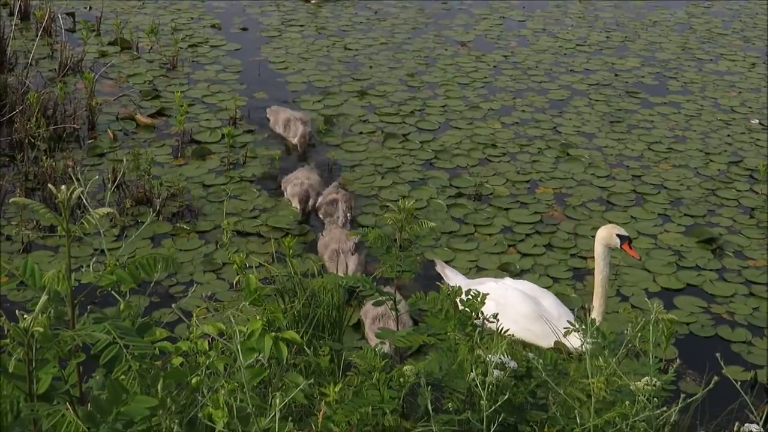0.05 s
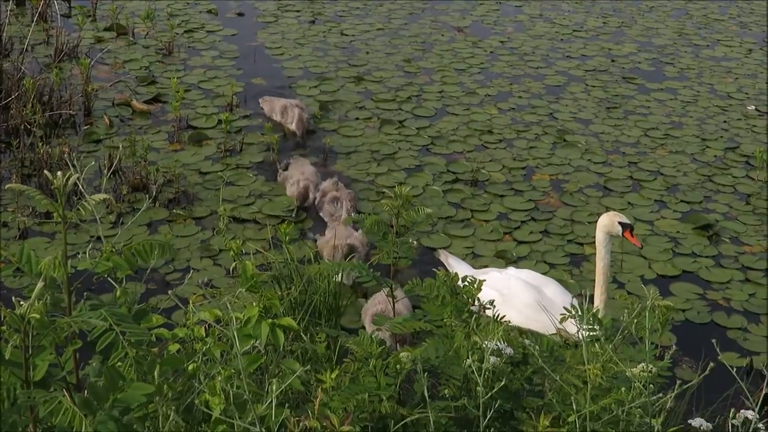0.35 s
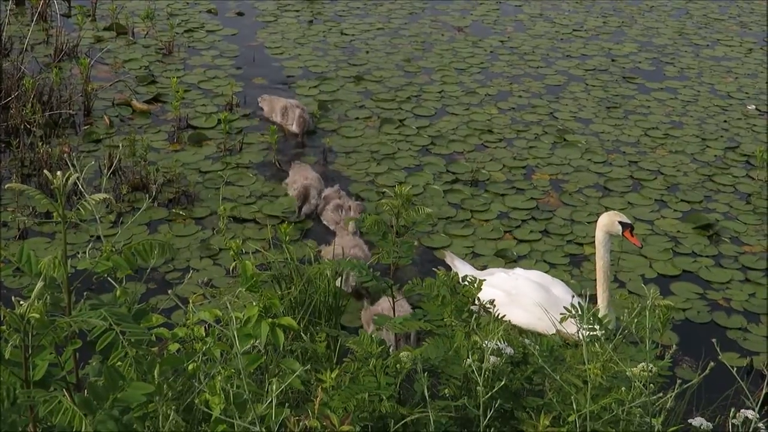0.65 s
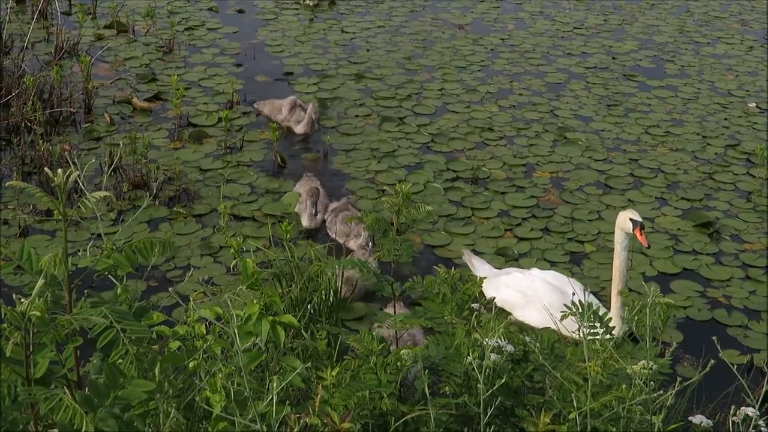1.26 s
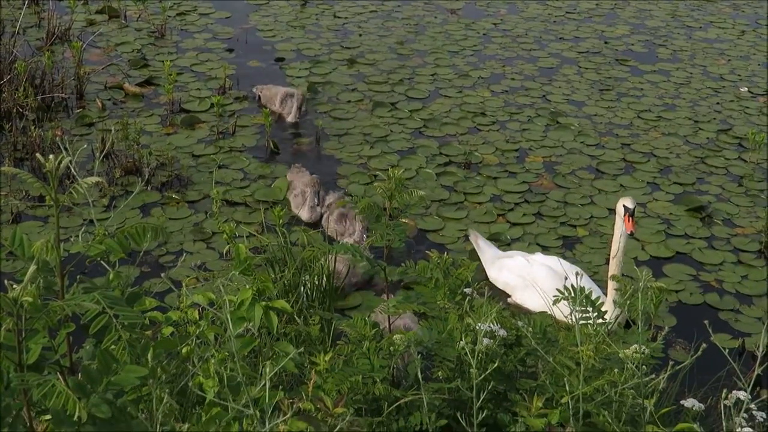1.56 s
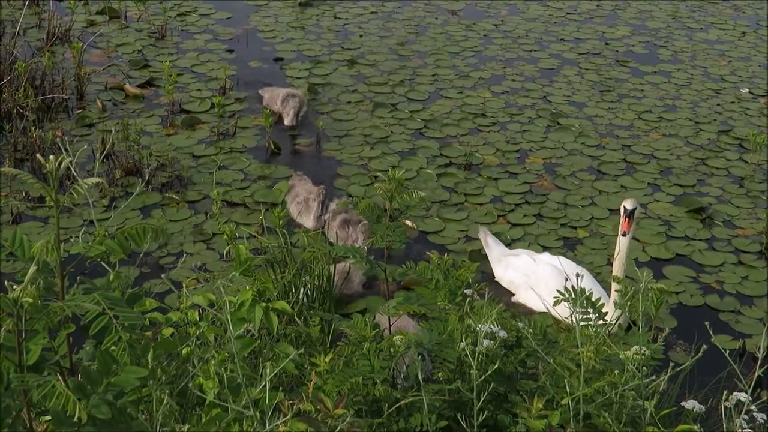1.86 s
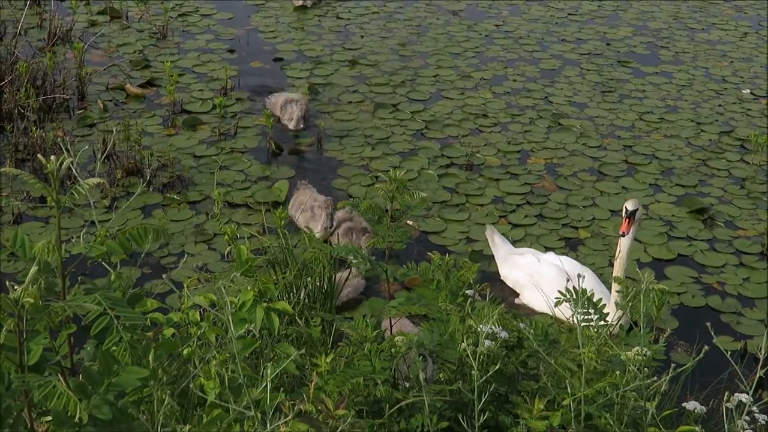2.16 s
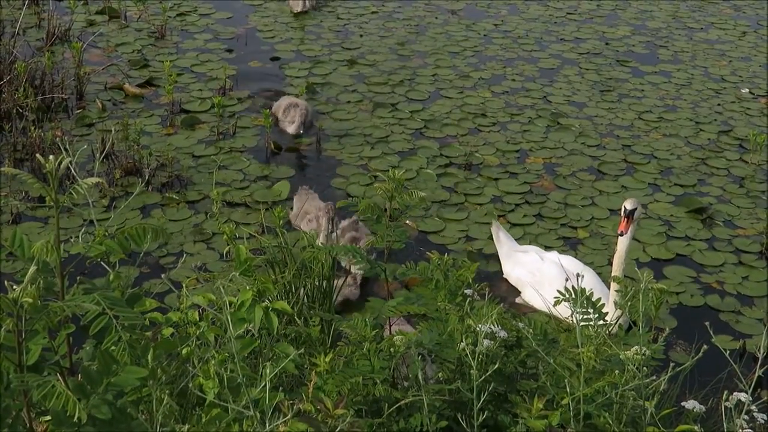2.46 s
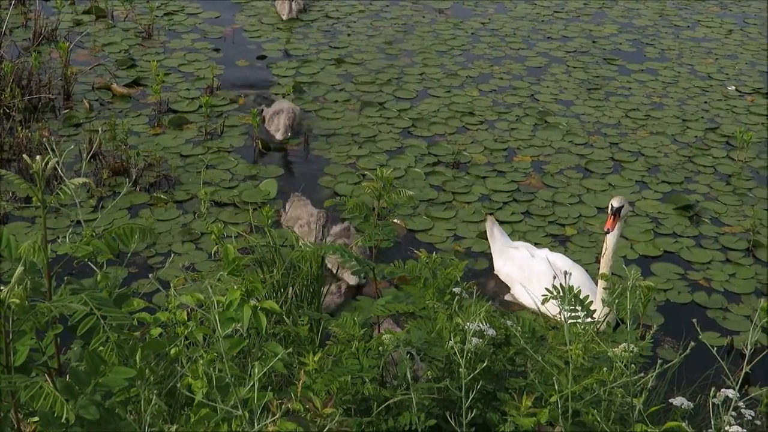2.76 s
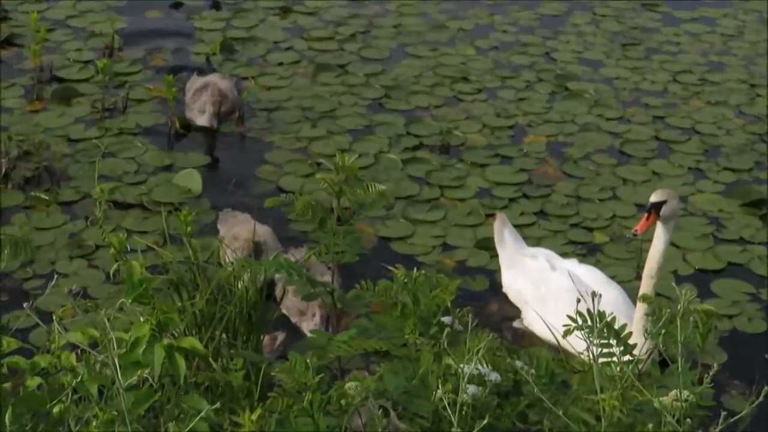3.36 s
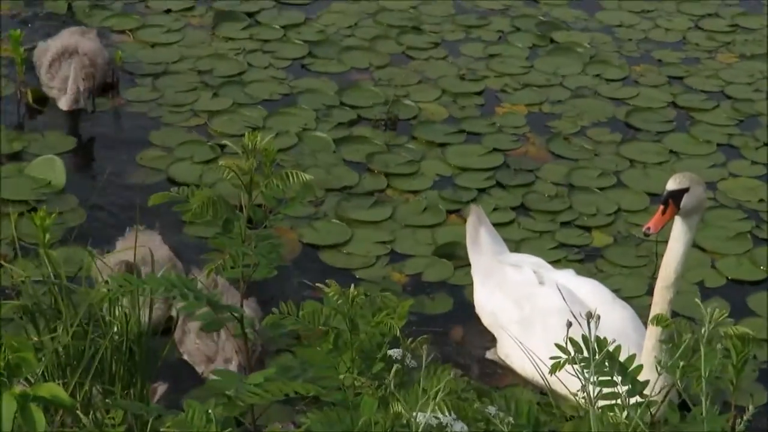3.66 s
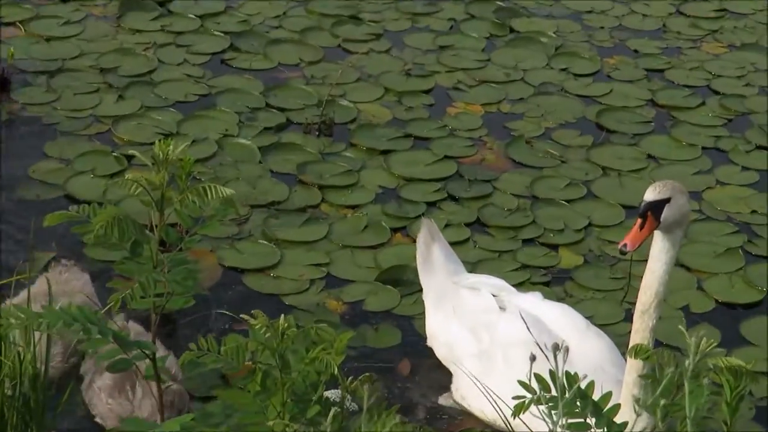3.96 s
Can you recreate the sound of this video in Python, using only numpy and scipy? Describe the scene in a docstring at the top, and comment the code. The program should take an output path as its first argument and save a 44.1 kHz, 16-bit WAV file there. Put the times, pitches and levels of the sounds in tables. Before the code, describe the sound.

Young swans give short, faint peeps at a pond while far-off traffic rumbles.

```python
"""Cygnets among lily pads

Cygnets peep softly in arched, sometimes hoarse tones as they push through weeds at a pond's edge.
Leaves brush, stems snap and small bubbles ring, with faint echoes from the bank. Distant traffic
rumbles throughout and far songbirds whistle and trill. Near the end a camera's zoom motor whirrs,
and the camera's noise reduction gives the background a watery flicker."""
import sys
import numpy as np
from scipy import signal
from scipy.io import wavfile
from scipy.ndimage import uniform_filter1d

SR = 44100
rng = np.random.default_rng(int(sys.argv[2]) if len(sys.argv) > 2 else 0)


def put_to_file(sound):
    """Save the sound as 16-bit audio at rate SR, in the file named by the first command-line argument."""
    columns = np.atleast_2d(sound).T  # one column per channel
    safe = np.clip(columns, -1, 1)
    whole_steps = np.round(safe * 32767)
    wavfile.write(sys.argv[1], SR, whole_steps.astype(np.int16))


N = 176400
T = np.arange(N) / SR


def from_db(db):
    """Amplitude ratio: tenfold for every 20 dB."""
    return 10 ** (np.asarray(db) / 20)


def rms_one(x):
    """Normalisation to a root mean square of 1."""
    return x / np.sqrt(np.mean(x ** 2) + 1e-20)


def level(rows):
    """Amplitude envelope, linear in dB between (seconds, dB) points."""
    return from_db(np.interp(T, *np.transpose(rows)))


def at_hz(points, hz):
    """Interpolation of (Hz, value) points on a logarithmic frequency axis."""
    frequencies, values = np.transpose(points)
    return np.interp(np.log(hz), np.log(frequencies), values)


def pan(db):
    """Direction by level difference: two gains, the left db above the right."""
    return from_db(np.array([[.5], [-.5]]) * db)


def band(x, low, high):
    """Butterworth band-pass filter, edges in Hz."""
    sos = signal.butter(2, [low, min(high, SR / 2 - 1000)], "band", fs=SR, output="sos")
    return signal.sosfilt(sos, x + 1e-18)


def drift(corner_hz):
    """Random fluctuation: low-passed noise of unit rms."""
    pole = np.exp(-40 * np.pi * corner_hz / SR)
    slow = signal.lfilter([1], [1, -2 * pole, pole * pole], rng.standard_normal(N // 20 + 2002))[2000:]
    return np.interp(np.arange(N) / 20, np.arange(len(slow)), rms_one(slow))


def burst(start_s, decay_s):
    """Sudden onset followed by exponential decay."""
    return (T >= start_s) * np.exp(-np.clip((T - start_s) / decay_s, 0, 20))


def wash(spectrum, flicker_db):
    """Partly correlated stereo noise in half-octave bands that fluctuate independently."""
    # Each row: frequency in Hz, correlation between left and right.
    correlation = [(200, 0.98), (480, 0.91), (950, 0.93), (1890, 0.6), (3770, -0.35), (7520, 0.88),
                   (15000, -0.27)]
    out, edges = 0, 125 * 2 ** np.arange(0, 7.1, .5)
    white = rng.standard_normal((2, 2, N))
    for k, (low, high) in enumerate(zip(edges, edges[1:])):
        hz = np.sqrt(low * high)
        mid, side = band(white[k % 2], low, high)
        alike = at_hz(correlation, hz)
        stereo = np.sqrt(1 + alike) * mid + np.sqrt(1 - alike) * side * [[1], [-1]]
        out = out + from_db(at_hz(spectrum, hz) + flicker_db * drift(23)) * stereo
    return rms_one(out)


def traffic():
    """Superposition of distant vehicles: centred rumble, wavering engine tones and wide tyre noise."""
    # Each row of both: frequency in Hz, relative spectral density in dB.
    rumble_spectrum = [(20, -26), (31, -18), (40, 0), (50, -20.5), (62, -2), (77, 3), (100, -1), (125, -4),
                       (160, -7), (200, -12.5), (260, -17), (340, -35.5), (600, -29)]
    tyre_spectrum = [(150, -7), (300, 1), (480, 2), (650, -3), (950, 0), (1400, -9.5), (2000, -10.5),
                     (2800, -20), (3600, -21), (5000, -31.5), (7500, -30.5), (10000, -40.5), (15000, -43)]
    # Each row: time in seconds, relative level of the rumble in dB.
    rumble_swell = [(0, -38), (.2, -40.5), (.35, -37.5), (.47, -39.5), (.78, -39), (1.15, -42.5),
                    (1.4, -41.5), (1.52, -39.5), (1.65, -41), (2.35, -40.5), (2.8, -43), (3.4, -38),
                    (3.8, -41), (4, -39.5)]
    # Each row: frequency in Hz, level in dB, rms frequency deviation in Hz.
    engines = [(49.04, -50, 1.19), (76.96, -52.5, 2.756), (505.5, -69, 3.78), (636, -71.5, 1.97)]
    edges = 18 * 2 ** (np.arange(16) / 3)
    white = rng.standard_normal((2, N + SR))
    rumble, hum = 0, 0
    for k, (low, high) in enumerate(zip(edges, edges[1:])):
        gain = from_db(at_hz(rumble_spectrum, np.sqrt(low * high)))
        rumble += gain * band(white[k % 2], low, high)[SR:]
    for hz, db, waver_hz in engines:
        phase = 2 * np.pi * np.cumsum(hz + waver_hz * drift(3.87)) / SR
        hum += from_db(db) * np.sqrt(2) * np.sin(phase)
    left, right = wash(tyre_spectrum, flicker_db=1.73)
    left_lag_s = .00005  # the road lies a little to the right
    tyres = pan(-1) * np.array([np.interp(T - left_lag_s, T, left), right])
    return from_db(-1) * level(rumble_swell) * rms_one(rumble) + hum + from_db(-54.5) * tyres


def leaves():
    """Friction noise: a grainy, fading hiss of leaves brushed as the brood enters the weeds."""
    # Each row: time in seconds, level in dB.
    rustle = [(0, -79.5), (.55, -79), (.75, -83), (1.1, -84), (4, -100)]
    grains = rng.standard_normal((2, N)) * from_db(2.2 * drift(150))
    return level(rustle) * rms_one(band(grains, 4330, 14500))


def cygnets():
    """Harmonic tones on an arched pitch; fast random frequency and amplitude modulation sounds hoarse."""
    # Each row: middle and length in seconds, top pitch in Hz, level in dB, relative level of the
    # octave in dB, roughness from 0 to 1, catch in the voice from 0 to 1, leftward pan in dB.
    peeps = [(0.046, 0.087, 2192, -64, -7.5, 0.88, 0.3, 0), (.234, 0.065, 2204, -62, -6, 0.88, 0.3, 2.5),
             (.265, .047, 2250, -57.5, -30, 0.2, 0.13, -2), (0.368, 0.049, 2340, -57.5, -33, 0.07, 0, -2.1),
             (0.443, 0.057, 2210, -56.5, -26, 0.54, 0.06, -1.1), (0.546, 0.051, 2375, -53.5, -27, 0, 0, -3),
             (0.64, 0.072, 2186, -59.5, -38, 0, 0.05, -8), (0.723, 0.045, 2340, -56, -29, 0.2, 0, -1.5),
             (0.789, 0.05, 2130, -66.5, -30, .8, 0.2, -5), (2.374, 0.037, 2300, -49, -14, 0.08, 0.8, 0),
             (2.574, 0.043, 2290, -58, -6.5, 0, 0.29, 1.5), (2.775, 0.038, 2273, -49.5, -20, 0, 0.73, -0.5),
             (3.012, 0.028, 2173, -57.5, -16, 0.43, 0.4, -1), (3.405, 0.026, 1934, -59.5, -23, 0.2, 0.5, 1),
             (3.58, 0.038, 1970, -69, -23, 0.35, 0, 5), (3.744, .05, 2044, -67.5, -16, 0.4, 0.03, -1)]
    arch_drop, arch_s = .029, .0265  # fractional fall in pitch at this time either side of the top
    lead_s, catch_s, catch_width_s = .026, .0186, .0059  # a lead-in note, then a break, before the middle
    out = np.zeros((2, N))
    jitter, flutter, wobble = drift(260), drift(260), drift(35)
    for middle, length, hz, db, octave_db, rough, catch, pan_db in peeps:
        near = np.abs(T - middle) < length
        t = T[near] - middle
        onset = np.clip(-2 * t / length, 0, 1)  # falls to 0 by the middle: peeps start rough and bright
        rasp = np.maximum(rough, .34 * onset)
        arch = 1 - 2 * arch_drop * (1 - .5 ** ((t / arch_s) ** 2))
        pitch = hz * (arch + .038 * rasp * jitter[near] + .0052 * wobble[near])
        scoop = 1 - 2.06 * catch * np.maximum(-(t + catch_s), 0)  # the lead-in slides upward
        phase = 2 * np.pi * np.cumsum(pitch * scoop) / SR
        swell = np.exp(-np.abs(2 * t / length) ** 3.6)
        lead = from_db(-4.5) * np.exp(-((t + lead_s) / (2 * catch_width_s)) ** 2)
        voice_break = 1 - catch * np.exp(-((t + catch_s) / catch_width_s) ** 2)
        fundamental = (swell + catch * lead) * voice_break * np.sin(phase)
        third, fourth = from_db(-28.5 + 18 * onset), from_db(-14.5) * rough
        overtones = np.sin(2 * phase) + third * np.sin(3 * phase) + fourth * np.sin(4 * phase)
        note = fundamental + from_db(octave_db) * swell * overtones
        out[:, near] += pan(pan_db) * from_db(db) * np.sqrt(2) * note * (1 + .64 * rasp * flutter[near])
    return out


def stems():
    """Impulsive excitation: each tiny snap of a weed is a bright, quickly damped burst of noise."""
    # Each row: start in seconds, initial level in dB, centre frequency in Hz.
    ticks = [(.1211, -67, 12000), (.3686, -73, 11000), (.4392, -60, 7500), (.471, -68, 9000),
             (.5135, -63, 12000), (.5228, -62, 11000), (0.528, -54, 9000), (.5505, -68, 9500),
             (.624, -64, 5970), (.6644, -69, 9000), (0.911, -56, 14000), (1.0011, -68, 12500),
             (1.1557, -67.5, 8500), (1.3823, -69, 12500), (1.5857, -73, 10000), (1.9839, -67.5, 9000),
             (2.0133, -72, 10000), (2.403, -75, 9800)]
    decay_s = .0014
    out, grit = np.zeros((2, N)), rng.standard_normal((2, N))
    for start, db, hz in ticks:
        near = (T >= start) & (T < start + 10 * decay_s)
        stereo = grit[0, near] + .4 * grit[1, near] * [[1], [-1]]
        snap = rms_one(band(stereo, hz * .64, hz * 1.34))
        out[:, near] += from_db(db) * snap * np.exp(-(T[near] - start) / decay_s)
    return out


def plips():
    """Bubble resonance: small bubbles ring as damped oscillators, with a dull puff of spray."""
    # Each row: start in seconds, relative level in dB.
    splashes = [(.262, -64), (0.4406, -60), (0.4452, -55.5), (.527, -60), (0.617, -67), (1.983, -57)]
    # Each row: resonant frequency in Hz, gain in dB, time to decay by 60 dB in seconds.
    bubble_modes = [(1910, 3.5, 0.028), (2160, -3, 0.06), (2500, 8.5, 0.021), (3110, 4, 0.016)]
    starts, levels_db = np.transpose(splashes)
    puffs = sum(from_db(db + 12) * burst(start, decay_s=.0046) for start, db in splashes)
    spray_hz = (1400, 3700)
    spray = band(puffs * rng.standard_normal(N), *spray_hz)
    out = band(spray, *spray_hz)  # a second pass steepens the band edges
    for hz, mode_db, t60 in bubble_modes:
        impulses = np.zeros(N)
        strengths = from_db(levels_db + mode_db + rng.normal(0, .67, len(starts)))
        onsets = starts + rng.uniform(0, .002, len(starts))
        impulses[(onsets * SR).astype(int)] = strengths
        radius, angle = from_db(-60 / (t60 * SR)), 2 * np.pi * hz / SR
        feedback = [1, -2 * radius * np.cos(angle), radius ** 2]
        out += signal.lfilter([0, np.sin(angle)], feedback, impulses + 1e-18)
    return out


def bank_echoes(x):
    """Scattering from the bank and reeds: delayed copies, weaker the later they arrive."""
    echo_db, t60_s = -13, .2
    out = np.zeros((2, N))
    for k, delay in enumerate(rng.uniform(.004, .14, size=24)):
        lag = int(delay * SR)
        out[k % 2, lag:] += from_db(-60 * delay / t60_s) * x[k % 2, :-lag]
    return from_db(echo_db) * out


def songbirds():
    """Frequency glides make thin whistles; distance blurs trills into fluttering bands of noise."""
    # Each row: start and length in seconds, first and last frequency in Hz, level in dB.
    whistles = [(.865, .135, 5380, 5365, -72.5), (1.368, .045, 4400, 6000, -76.5),
                (1.91, .075, 4600, 6400, -80), (2.095, .07, 5350, 6100, -79.5)]
    # Each row: centre and bandwidth in Hz, level in dB, middle and half length in seconds.
    trills = [(2756, 134, -67, 1.44, 0.34), (2500, 790, -69.5, 1.27, 0.46), (3540, 980, -76, 1.28, 0.39),
              (4180, 710, -78, 1.4, 0.37), (4890, 320, -79.5, 1.34, 0.5), (2940, 330, -72, 2.04, 0.23),
              (2250, 190, -86, 1.7, 0.17), (3000, 400, -89, 3.2, 0.32), (2610, 220, -76, 3.33, 0.27),
              (5900, 1300, -78, 0.095, 0.21)]
    out = np.zeros((2, N))
    for start, length, first_hz, last_hz, db in whistles:
        progress = np.clip((T - start) / length, 0, 1)
        glide = last_hz + (first_hz - last_hz) * (1 - progress) ** 1.6  # fast at first, then levelling
        phase = 2 * np.pi * np.cumsum(glide * (1 + .0029 * drift(150))) / SR
        out += from_db(db) * np.sin(np.pi * progress) * np.sin(phase) * (1 + .47 * drift(60))
    for hz, width, db, middle, half_length in trills:
        song = rms_one(band(rng.standard_normal((2, N)), hz - width / 2, hz + width / 2))
        swell = 1 / (1 + np.abs((T - middle) / half_length) ** 5.4)
        out += from_db(db + 1.5 * drift(18)) * swell * song
    return out


def zoom_motor():
    """Structure-borne sound: a hissing lens drive's gears knock and shake two microphones in antiphase."""
    # Each row: time in seconds, level in dB.
    hiss_levels = [(3.09, -110), (3.125, -73.5), (3.22, -72), (3.28, -68.5), (4, -69)]
    # Each row: frequency in Hz, relative spectral density in dB.
    hiss_spectrum = [(300, -26), (1500, -16), (2700, 4.5), (4000, 5.5), (6500, 0), (9000, -4.5),
                     (14000, -7)]
    knock_s, decay_s = 3.18, .042
    hiss = level(hiss_levels) * wash(hiss_spectrum, flicker_db=-1.0)
    vibration = rms_one(band(rng.standard_normal(N), 222, 532))
    gear_noise = rms_one(band(rng.standard_normal((2, N)), 234, 450))
    knock = band(from_db(-45.5) * burst(knock_s, decay_s) * gear_noise, 91, 1100)
    running = np.clip((T - knock_s) / decay_s, 0, 1)
    return hiss + knock + from_db(-67) * running * vibration * [[1], [-1]]


def noise_reduction(x):
    """Spectral subtraction during the zoom: removing part of each mean level leaves a watery flicker."""
    # Each row: frequency in Hz, share of the mean amplitude subtracted.
    shares = [(300, 0), (700, 0.068), (1200, 0.38), (2100, 0.4), (3200, 0.49), (6000, 0.59), (9000, 0.65),
              (14000, 1)]
    start_s, fade_s, floor_db = 3.22, .06, -20
    hz, times, spectrum = signal.stft(x, SR, nperseg=1024)
    strength = np.sqrt(uniform_filter1d(np.abs(spectrum) ** 2, size=3, axis=1) + 1e-24)
    mean_strength = uniform_filter1d(strength[:, times > start_s].mean(axis=1), size=9)
    noise = mean_strength * at_hz(shares, hz + 1)
    depth = np.clip((times - start_s) / fade_s, 0, 1)
    gain = np.maximum(1 - depth * noise[:, None] / strength, from_db(floor_db))
    return signal.istft(spectrum * gain, SR, nperseg=1024)[1][:N]


def scene():
    """Superposition of the brood in the weeds, its echoes, the far surroundings and the zoom motor."""
    near = cygnets() + stems() + plips()
    return near + bank_echoes(near) + leaves() + songbirds() + traffic() + zoom_motor()


def record(dry):
    """Mid-side processing: noise reduction acts on what both channels share; a steep low-pass follows."""
    mid, side = noise_reduction(dry.mean(axis=0)), (dry[0] - dry[1]) / 2
    cutoff_hz = 15200
    treble_cut = signal.ellip(10, .1, 80, cutoff_hz, fs=SR, output="sos")
    return signal.sosfilt(treble_cut, mid + side * [[1], [-1]])


dry = scene()
out = record(dry)
put_to_file(out)
```